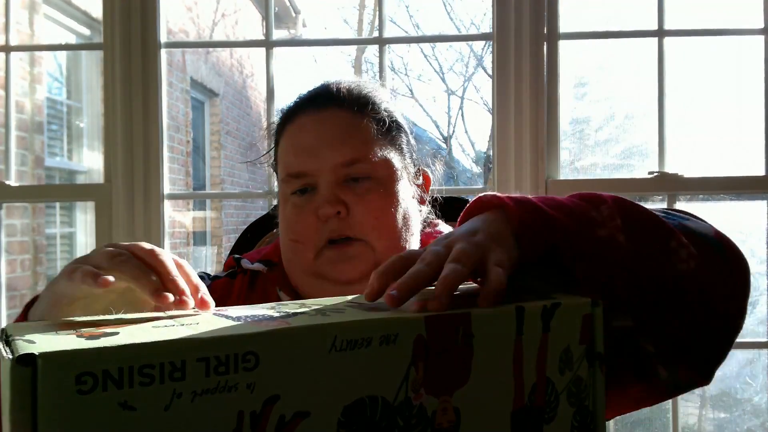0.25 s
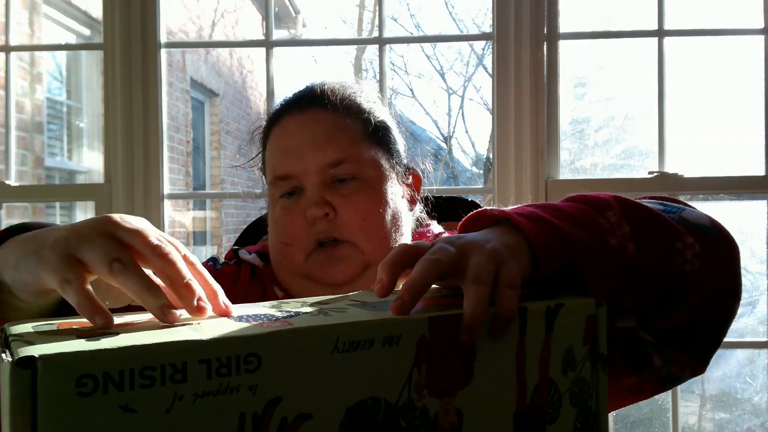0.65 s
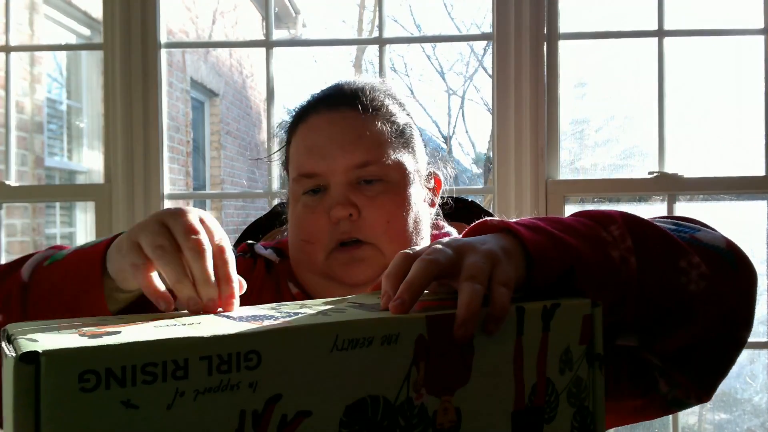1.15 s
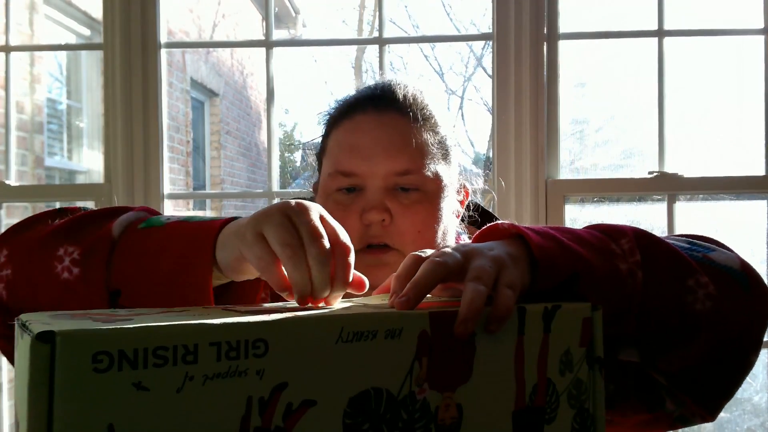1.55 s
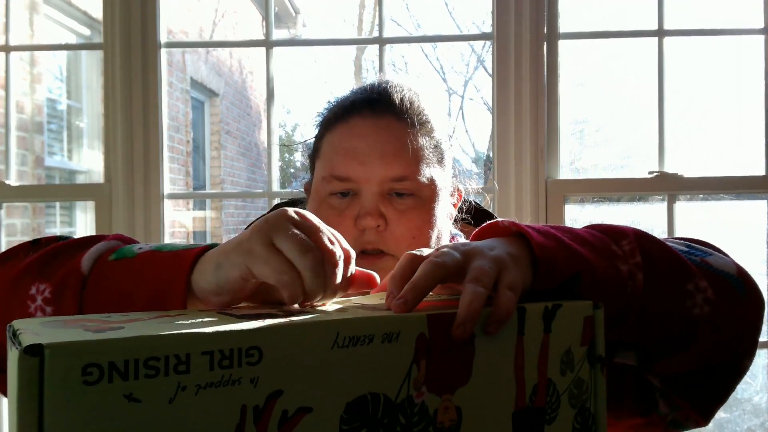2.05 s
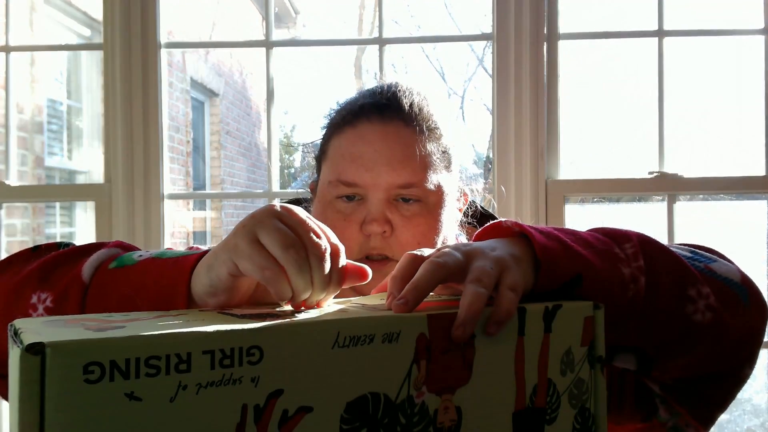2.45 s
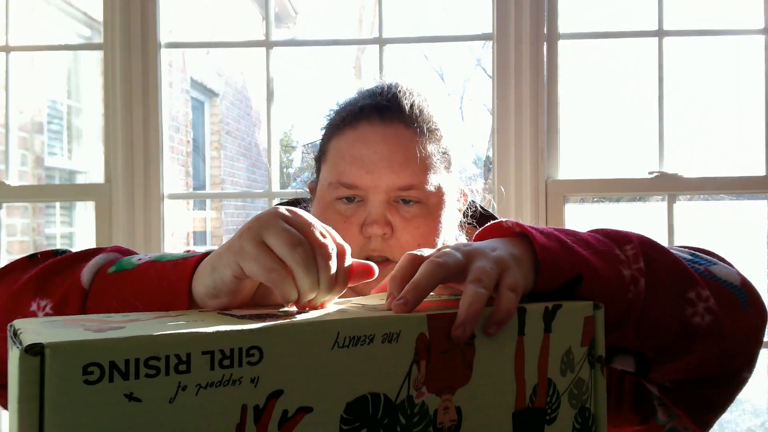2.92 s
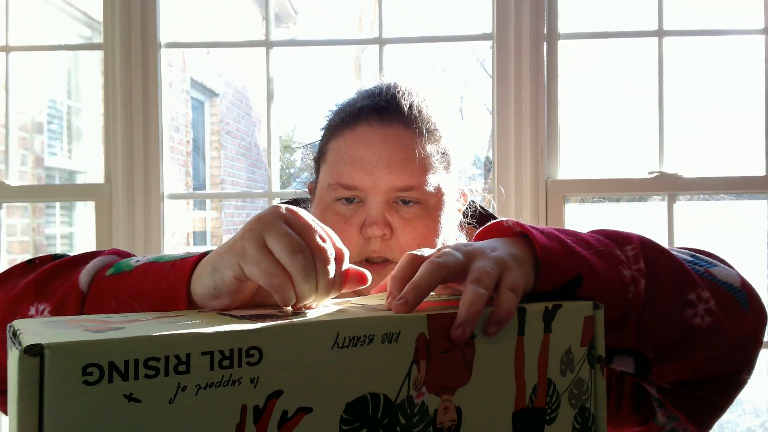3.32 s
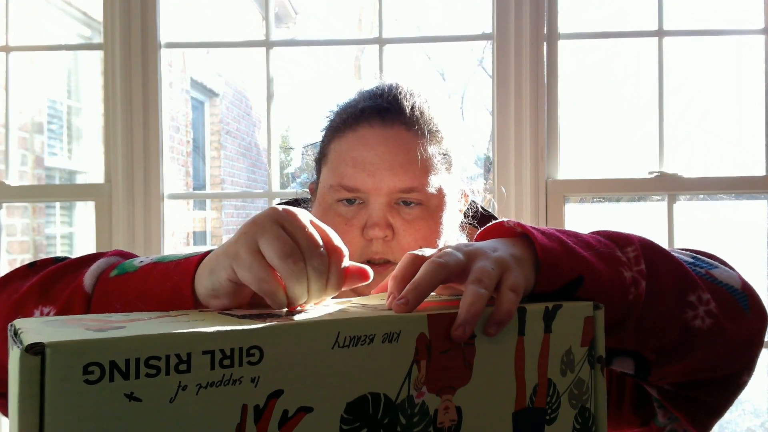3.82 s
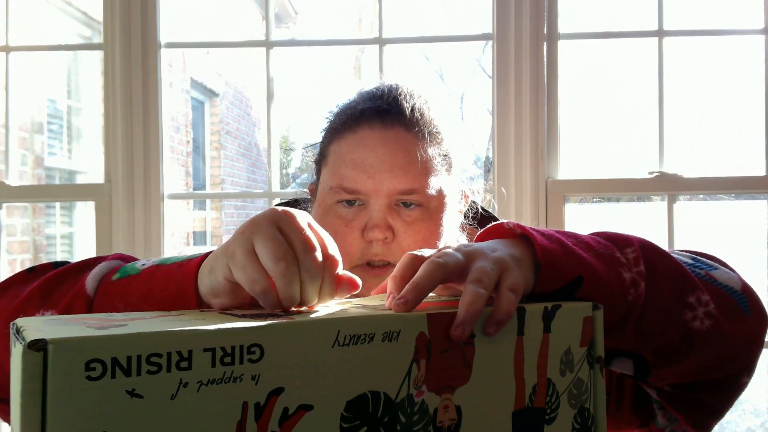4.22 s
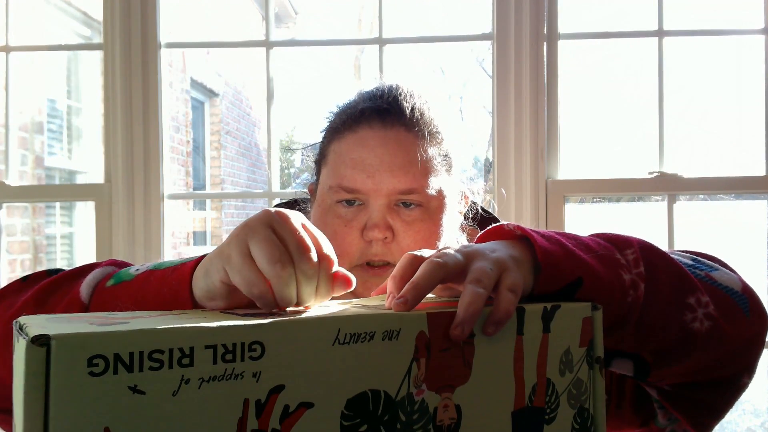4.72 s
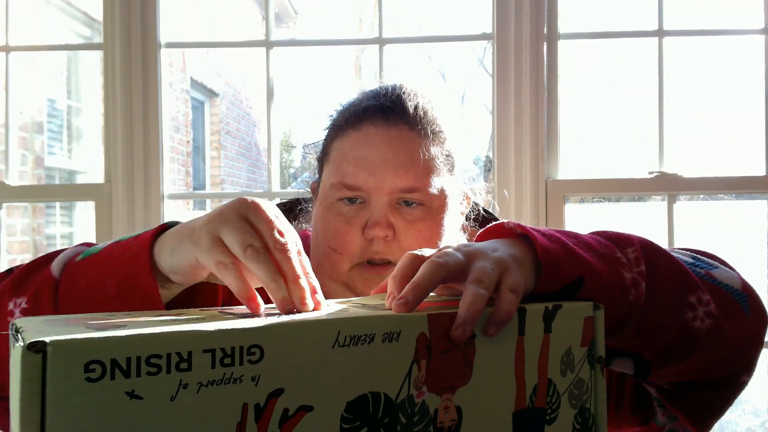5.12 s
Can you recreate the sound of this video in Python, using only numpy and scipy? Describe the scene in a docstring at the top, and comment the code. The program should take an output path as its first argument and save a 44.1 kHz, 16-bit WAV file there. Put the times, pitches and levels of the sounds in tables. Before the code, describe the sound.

In a small, quiet room, close stereo microphones hear hands working at a taped cardboard box, slightly to the left. Soft rubbing strokes give way to irregular fingernail picks: crisp ticks of tape with hollow knocks, mixed with brief scratches and a faint low rumble as the box sways. Late on, a faint high whistle comes and goes, the box settles on the table with a soft bump, and the picking continues sparsely.

```python
"""A hollow cardboard box on a table in a small, still room; a stereo pair close by, hands to the left.
First, fingertips hiss over the packing tape. From about 1 s a nail catches its edge again and again
and slips off: the tape snaps and the lid knocks, with short rasping strokes and soft taps in between.
From 1.8 s the box sways under the pressing hands. Near 4 s a thin whistle swells and fades in the
background; just after it the tipped box drops back on the table, and a few last picks follow."""
import sys
import numpy as np
from scipy import signal
from scipy.fft import rfft, irfft
from scipy.io import wavfile

SR = 44100
rng = np.random.default_rng(int(sys.argv[2]) if len(sys.argv) > 2 else 0)


def transcribe(signal):
    """Save signal, clipped to [-1, 1], as a 16-bit WAV file at the path in sys.argv[1]."""
    frames = np.atleast_2d(signal).T
    limited = np.clip(frames, -1, 1)
    pcm = np.round(limited * 32767).astype(np.int16)
    wavfile.write(sys.argv[1], SR, pcm)


N = 237166
TIME = np.arange(N) / SR

# modes of the cardboard lid: (frequency [Hz], level [dB], t60 [s])
LID_MODES = [(149.6, -20.5, 0.34), (196, -14.5, 0.078), (247, -10, 0.14), (300.4, 3.5, 0.047),
             (316, -25, 0.17), (450, -25, 0.015), (458, -15, 0.071), (566, -13.5, 0.058),
             (840, -10.5, 0.023), (1060, -22, 0.068), (1677, -0.5, 0.049)]
# the nail slips off the tape edge: (time [s], film tick [relative dB], liner crack [dB],
# lid knock [relative dB], crackle decay [s], ring of the loose flap [Hz])
NAIL_PICKS = [(1.0854, -33, -45, -45, .0008, 13200), (1.712, -41, -37, -30, 0.0015, 14800),
              (1.8397, -35, -30, -18, 0.0032, 14400), (1.9206, -23.5, -38, -43, 0.0016, 9700),
              (1.9275, -25.5, -33, -36, 0.0024, 11000), (1.934, -28, -35.5, -48, 0.00063, 12000),
              (1.9365, -21.5, -26, -27, .0009, 11400), (2.0308, -16.5, -22.5, -28, 0.0016, 14000),
              (2.0675, -17, -25.5, -30, 0.0036, 14700), (2.0827, -23, -25, -45, .0006, 11600),
              (2.0856, -9.5, -17.5, -23.5, 0.00062, 12800), (2.1788, -36.5, -47, -54, .0003, 9300),
              (2.2324, -34.5, -43, -58, 0.00074, 12900), (2.5687, -39.5, -65, -67, .0009, 10100),
              (2.6497, -35.5, -35, -27, 0.00096, 14800), (2.6707, -12.5, -17.5, -20, 0.00086, 13800),
              (2.8116, -37.5, -39.5, -59, .0008, 15000), (3.153, -32, -39, -17, 0.00092, 14500),
              (3.6821, -32, -34, -16.5, 0.0037, 14300), (3.6855, -25, -34, -48, .0005, 13600),
              (3.7086, -26, -18.5, -18.5, 0.0013, 9400), (3.8451, -32, -42.5, -56, 0.0014, 9500),
              (4.2895, -22, -28.5, -14, 0.00053, 11100), (4.324, -34, -50, -58, .0012, 15000),
              (4.851, -25.5, -30, -26, .0012, 11900), (4.8553, -31.5, -28, -13, .0018, 10500),
              (5.088, -33.5, -49, -57, .0019, 14100)]
CONTACT_S = 0.0004  # how long a middling knock pushes on the lid


def gain_of(db):
    """Decibels to amplitude."""
    return 10 ** (np.asarray(db) / 20)


def unit_rms(x):
    """Scales to rms 1."""
    return x / np.sqrt(np.mean(x ** 2) + 1e-20)


def curve_at(points, hz):
    """Reads a table on a log-frequency axis."""
    f, value = np.transpose(points)
    return np.interp(np.log(hz + 1), np.log(f + 1), value)


def add(mix, start_s, sound):
    """Mixes a sound in at its start time."""
    part = mix[max(round(start_s * SR), 0):][:len(sound)]
    part += sound[:len(part)]


def colour(x, spectrum, size=2048):
    """Passes a sound through the causal filter that has a given spectrum."""
    log_gain = np.log(gain_of(curve_at(spectrum, abs(np.fft.fftfreq(size, 1 / SR)))))
    response = np.fft.ifft(np.exp(np.conj(signal.hilbert(log_gain)))).real[:size // 2]
    return signal.oaconvolve(x, response)[:len(x)]


def narrow_noise(hz, width_hz):
    """Noise in one narrow resonance, rms 1."""
    f = np.fft.rfftfreq(N, 1 / SR)
    return unit_rms(irfft(rfft(rng.standard_normal(N)) / (1 + ((f - hz) / width_hz) ** 2), N))


def wavering_tone(hz, width_hz):
    """A tone of even strength whose pitch wanders, rms 1."""
    phase = np.angle(signal.hilbert(narrow_noise(hz, width_hz)))
    return unit_rms(np.cos(phase))


def room_tone(level_db=-50.5):
    """Steady noise of the still room, alike at both microphones in the bass and unrelated in the treble."""
    spectrum = [(20, -3), (32, -2), (50, -14), (90, -13.5), (190, -16), (290, -14), (420, -21), (900, -24),
                (1300, -26.5), (2000, -24), (2900, -23), (3900, -31), (5500, -28), (9800, -33.5),
                (15000, -36.5)]  # noise floor: (frequency [Hz], relative density [dB])
    likeness = [(60, 0.77), (300, 0.73), (700, 0.59), (1400, 0.61), (3100, 0.27), (7000, 0)]  # likeness of left and right: (frequency [Hz], correlation [0-1])
    balance = [(60, -2), (400, -2.5), (1300, -3.5), (2400, -9), (4400, -4), (8000, -8), (15000, 11)]  # lean to one side: (frequency [Hz], left minus right [dB])
    hz = np.fft.rfftfreq(N, 1 / SR)
    common, separate = rfft(rng.standard_normal((2, N)))
    same, tilt_db = curve_at(likeness, hz), curve_at(balance, hz)
    left = common * gain_of(tilt_db / 2)
    right = (same * common + np.sqrt(1 - same ** 2) * separate) * gain_of(-tilt_db / 2)
    noise = irfft(np.array([left, right]) * gain_of(curve_at(spectrum, hz)), N)
    return gain_of(level_db) * noise / np.std(noise.mean(0))


def whistle(hz=3010, peak_s=4.025, gain_db=-50.5, rise_db_per_s=220, fall_db_per_s=97, flutter_hz=40):
    """A thin fluttering tone swells and fades in the background, blurred by the room."""
    age = TIME - peak_s
    swell = gain_of(gain_db + np.minimum(rise_db_per_s * age, -fall_db_per_s * age))
    blur = gain_of(-6) * np.array([narrow_noise(hz, width_hz=78) for _ in range(2)])
    flutter = 1 + 0.93 * np.sin(2 * np.pi * flutter_hz * TIME)
    return swell * (wavering_tone(hz, width_hz=18) * flutter + blur)


def box_sway(hz=30.05, wander_db=-10):
    """The box rocks at its lowest resonance, more and then less through each press of the hands."""
    presses = [(1.802, 3.71, -44), (3.75, 4.7, -49)]  # the hands lean in and ease off: (start [s], end [s], sway [dB])
    lean = sum(gain_of(db) * np.sin(np.pi * np.clip((TIME - start) / (end - start), 0, 1))
               for start, end, db in presses)
    rocking = wavering_tone(hz, width_hz=1.68)
    wander = gain_of(wander_db) * narrow_noise(hz=22.6, width_hz=5.8)
    return lean * (rocking + wander)


def box_ring(modes, hold=1, pitch=1, scatter_db=3.5, detune=0.027):
    """Dying modes; a finger lands on a new spot each time, and its pressure damps and tunes them."""
    t = np.arange(SR // 4) / SR
    spot = rng.standard_normal((len(modes), 2))
    return sum(gain_of(db + scatter_db * louder - 60 * t / (t60 * hold))
               * np.cos(2 * np.pi * hz * (pitch + detune * sharper) * t)
               for (hz, db, t60), (louder, sharper) in zip(modes, spot))


def friction_slips(per_s, spread_db):
    """Friction as tiny slips at random moments, rms 1."""
    size = gain_of(spread_db * np.minimum(rng.exponential(1, N), 4))
    return unit_rms(size * rng.choice([-1, 1], N) * (rng.random(N) < per_s / SR))


def rubbing(uneven_db=3.5, glide_db=-56, glide_end_s=1.4, lid_db=-8):
    """Each stroke speeds up and slows; skin slips finely, the nail coarsely enough to sound the lid."""
    strokes = [(0, 0.09, -42, -50.5), (0.15, 0.223, -38, -54.5), (0.238, 0.406, -38.5, -55.5),
               (0.49, 0.754, -41.5, -59), (0.78, 0.92, -41, -68), (0.968, 1.04, -40, -66),
               (1.16, 1.464, -38.5, -53), (1.385, 1.47, -51.5, -47), (1.453, 1.525, -36, -44.5),
               (1.532, 1.586, -46, -42), (1.649, 1.668, -43, -49.5), (2.322, 2.362, -48, -48),
               (2.372, 2.462, -50, -43.5), (2.81, 2.843, -41, -48), (2.86, 3.043, -67, -50.5),
               (3.576, 3.68, -69, -55), (3.84, 3.876, -40, -54), (3.94, 4.004, -48, -45),
               (4.302, 4.334, -39.5, -41.5), (4.459, 4.513, -37, -46), (4.58, 4.68, -38, -42),
               (5.062, 5.102, -36, -48), (5.139, 5.243, -39.5, -57.5)]  # strokes over the lid: (start [s], end [s], skin hiss [dB], nail rasp [dB])
    skin_spectrum = [(300, -32), (2000, -20), (5000, -15), (9000, -11), (11500, -7), (13000, -4),
                     (14300, 0), (16000, 1)]  # skin on plastic film: (frequency [Hz], level [dB])
    nail_spectrum = [(60, -5), (170, -9), (280, 2), (450, -2.5), (750, -9), (1100, -5.5), (1900, -19.5),
                     (3500, -23), (7000, -19), (11000, -20.5), (16000, -17)]  # a nail dragging on the lid: (frequency [Hz], level [dB])
    # at first the fingertips never leave the tape
    slide = gain_of(glide_db) * np.clip((glide_end_s - TIME) * 10, 0, 1)
    drag = np.zeros(N)
    for start, end, skin_db, nail_db in strokes:
        fastest = start + 0.25 * (end - start)
        speed = np.sqrt(np.interp(TIME, [start, fastest, end], [0, 1, 0]))
        slide = np.hypot(slide, gain_of(skin_db) * speed)
        drag = np.hypot(drag, gain_of(nail_db) * speed)
    pressure = gain_of(uneven_db * narrow_noise(hz=8, width_hz=25))
    hiss = unit_rms(colour(friction_slips(per_s=6900, spread_db=2.0), skin_spectrum))
    nail_slips = friction_slips(per_s=1100, spread_db=0)
    rasp = unit_rms(colour(nail_slips, nail_spectrum))
    lid = gain_of(lid_db) * unit_rms(signal.oaconvolve(nail_slips, box_ring(LID_MODES))[:N])
    return pressure * (slide * hiss + drag * (rasp + lid))


def lid_blows(middling_db=-24, doubling_db=7.5, shortest_s=0.00026, tap_contact_s=0.00068, thud_db=-18.5):
    """Every push on the lid: (time [s], knock [relative dB], contact [s], thud [relative dB], hold)."""
    taps = [(1.087, -35.5), (1.234, -42), (1.288, -37.5), (1.529, -34), (2.52, -39), (3.032, -38.5),
            (3.982, -32.5)]  # a fingertip lands softly: (time [s], knock [relative dB])
    damped, free = 0.74, 1.7  # hold, a factor on ring time: a pick leaves the finger on, a tap does not
    blows = []
    for at, _, _, db, *_ in NAIL_PICKS:
        contact = CONTACT_S * 2 ** ((db - middling_db) / doubling_db)  # a heavier knock pushes longer
        blows.append((at, db, max(contact, shortest_s), db + thud_db, damped))
    blows += [(at, db, tap_contact_s, db + thud_db, free) for at, db in taps]
    box_drop = (4.3103, -31, CONTACT_S, -27.5, damped)  # tipped by a pick, it falls back on the table
    return blows + [box_drop]


def knocks(knock_trim_db=-1.5, thud_trim_db=-2, lead_s=0.001, sag_per_doubling=0.028):
    """A short smooth push rings the lid, and a slower one jolts the whole box."""
    body_modes = [(54, -1, .1), (76, 0, .09), (96, -4, .07)]  # the whole box on the table: (frequency [Hz], level [dB], t60 [s])
    out, t = np.zeros(N), np.arange(SR // 200) / SR
    jolt = np.hanning(len(t))
    for at, knock_db, contact, thud_db, hold in lid_blows():
        push = np.exp(-abs(t - lead_s) / (contact / 2))
        pitch = 1 - sag_per_doubling * np.log2(contact / CONTACT_S)  # a longer push loads the lid
        knock = np.convolve(box_ring(LID_MODES, hold, pitch), push / push.sum())
        thud = np.convolve(box_ring(body_modes), jolt / jolt.sum())
        add(out, at - lead_s, gain_of(knock_db + knock_trim_db) * knock)
        add(out, at - lead_s, gain_of(thud_db + thud_trim_db) * thud)
    return out


def tape_snaps(tick_trim_db=1, film_crackle=0.15, liner_crackle=0.12, flap_db=4, flap_width_hz=3000):
    """One sharp release and a dying crackle of glue sound in the film, its loose flap and the liner."""
    film_spectrum = [(500, -36), (2500, -11.5), (4200, -3.5), (6500, 0), (8500, -1), (11000, -0.5),
                     (13000, -4.5), (15500, -2)]  # a snap in the tape film: (frequency [Hz], level [dB])
    liner_spectrum = [(200, -10), (600, -8.5), (1100, -0.5), (1400, -7.5), (1850, -1), (2500, -8),
                      (3400, -15), (7000, -13), (16000, -51)]  # a snap in the paper liner under it: (frequency [Hz], level [dB])
    out, t = np.zeros(N), np.arange(1024) / SR
    release = t == 0
    attack = int(0.0015 * SR)  # the first 1.5 ms set a snap's level
    for at, tick_db, crack_db, _, decay, flap_hz in NAIL_PICKS:
        glue = rng.standard_normal((2, len(t))) * np.exp(-t / decay)
        tick = colour(release + film_crackle * glue[0], film_spectrum)
        flap = signal.iirpeak(flap_hz, flap_hz / flap_width_hz, SR)
        tick += gain_of(flap_db) * signal.lfilter(*flap, tick)
        crack = colour(release + liner_crackle * glue[1], liner_spectrum)
        for part, db in ((tick, tick_db + tick_trim_db), (crack, crack_db)):
            add(out, at, gain_of(db) * part / np.sqrt(np.mean(part[:attack] ** 2)))
    return out


def small_room(x, wall_s=0.0115, spread_s=0.002, wall_hz=900, near_db=-9, right_db=-1, mono_hz=600):
    """Weak scatter from nearby, a bright cluster of echoes from the walls, then a short tail."""
    decay_times = [(100, 1.06), (300, 0.38), (1400, 0.2955), (4000, 0.28), (10000, 0.17), (16000, 0.53)]  # the room's decay: (frequency [Hz], t60 [s])
    echo_spectrum = [(60, -16.5), (300, -13.5), (700, -4), (1800, -3.5), (4500, -3), (9000, -7),
                     (16000, -16)]  # colour of its echoes: (frequency [Hz], relative level [dB])
    t = np.arange(SR // 2) / SR
    echoes = rng.choice([-1, 1], (2, len(t))) * (rng.random((2, len(t))) < 0.25)
    echoes = echoes * np.where(t < wall_s - spread_s, gain_of(near_db), 1) * (t > 0.002)
    hz, age, bands = signal.stft(echoes, SR, nperseg=128)
    cluster = np.exp(-((age - wall_s) / spread_s) ** 2)  # the nearest walls answer together
    bands *= 1 + gain_of(11) / 2 * cluster * (hz / (hz + wall_hz))[:, None]
    same = 1 / (1 + (hz[:, None] / mono_hz) ** 2)  # long waves reach both microphones alike
    bands[1] = same * bands[0] + np.sqrt(1 - same ** 2) * bands[1]
    bands *= gain_of(-60 * age / curve_at(decay_times, hz)[:, None])
    tails = signal.istft(bands, SR, nperseg=128)[1]
    source = colour(x, echo_spectrum)
    wet = [signal.fftconvolve(source, tail / np.linalg.norm(tail))[:N] for tail in tails]
    return np.array(wet) * gain_of([[0], [right_db]])


def scene(reverb_db=-0.63, right_lag_samples=2):
    """The hand works nearer the left microphone; the right one hears it later and duller."""
    off_axis = [(100, -0.5), (300, -2.5), (700, -4), (1200, -12.5), (2500, -12), (5000, -8.5),
                (9000, -16.5), (16000, -43)]  # the right microphone faces away: (frequency [Hz], level [dB])
    hand = tape_snaps() + knocks() + rubbing()
    direct = np.array([hand, np.roll(colour(hand, off_axis), right_lag_samples)])
    return direct + gain_of(reverb_db) * small_room(hand) + box_sway() + whistle() + room_tone()


def record(dry):
    """Both channels are limited to full scale, then low-passed near 16 kHz."""
    low_pass = signal.firwin(511, 15950, window=("kaiser", 9), fs=SR)
    return signal.oaconvolve(np.clip(dry, -1, 1), low_pass[None], "same", axes=1)


dry = scene()
out = record(dry)
transcribe(out)
```